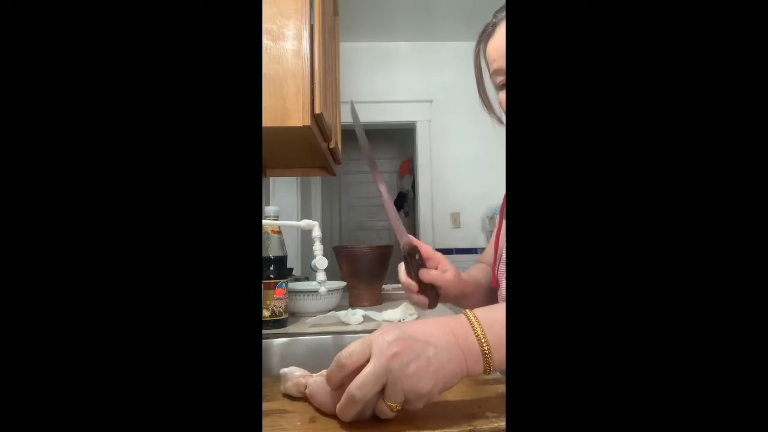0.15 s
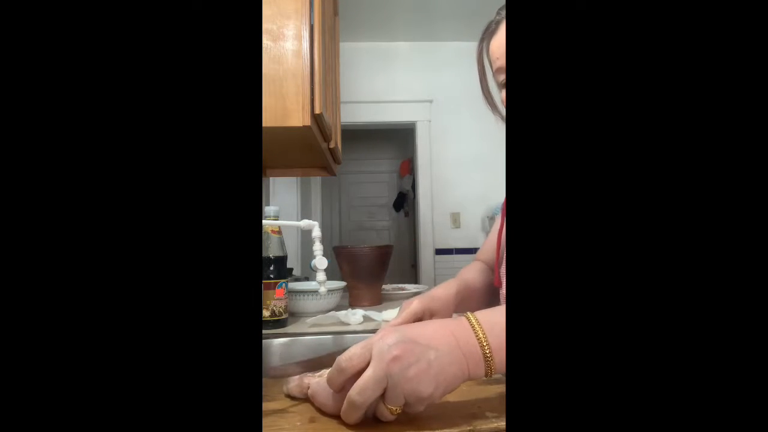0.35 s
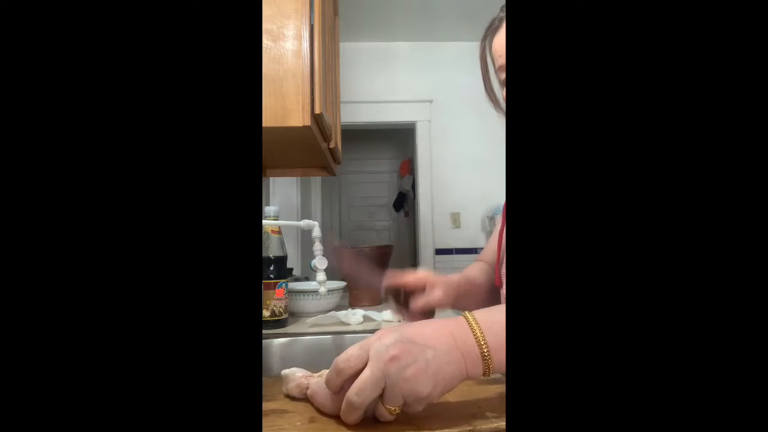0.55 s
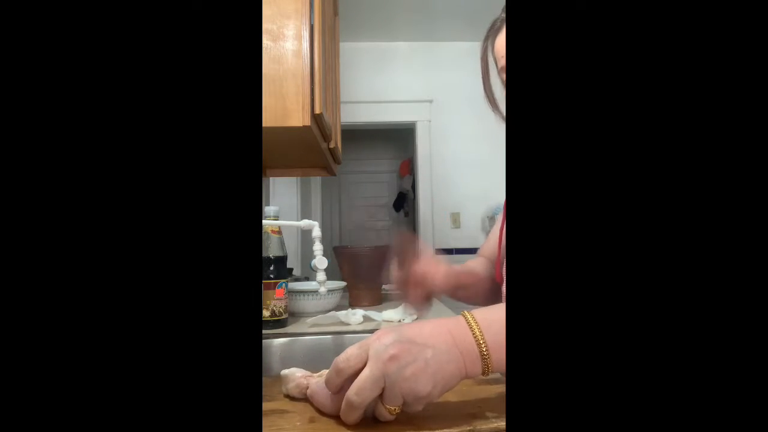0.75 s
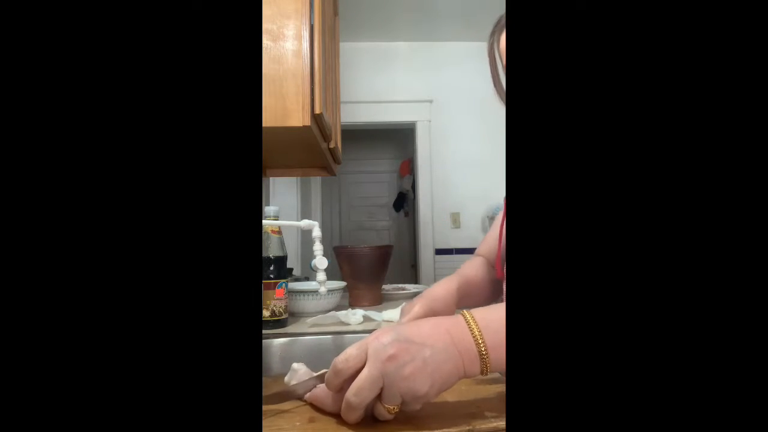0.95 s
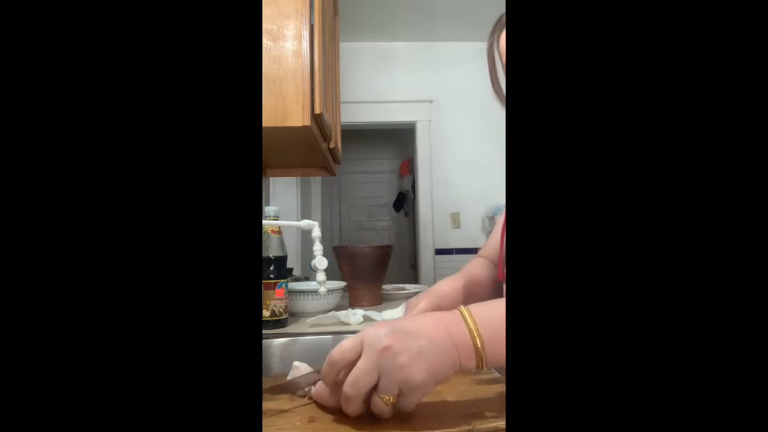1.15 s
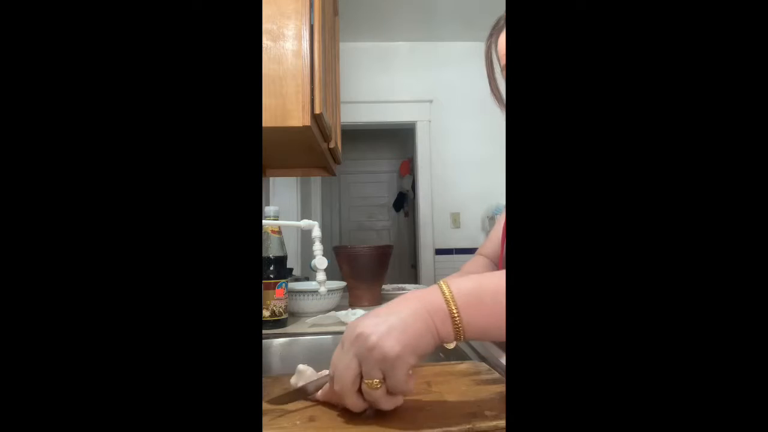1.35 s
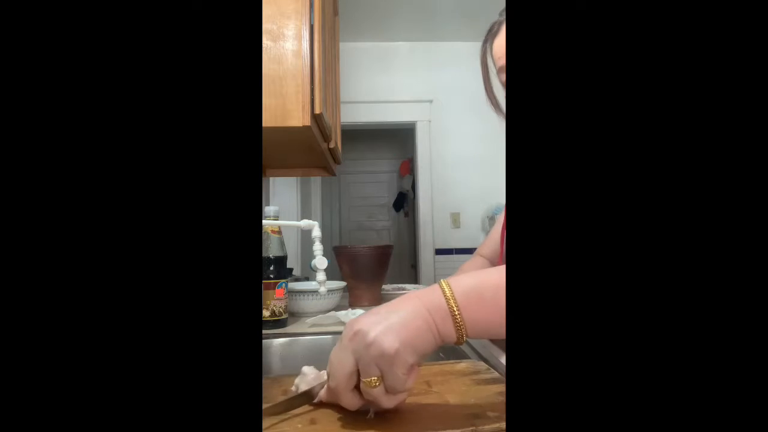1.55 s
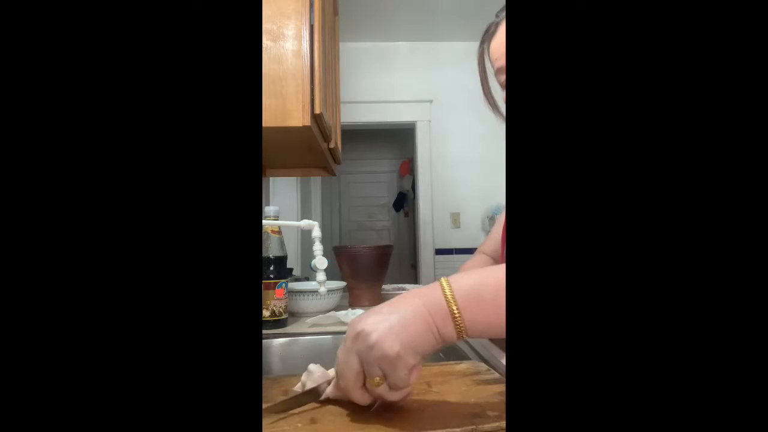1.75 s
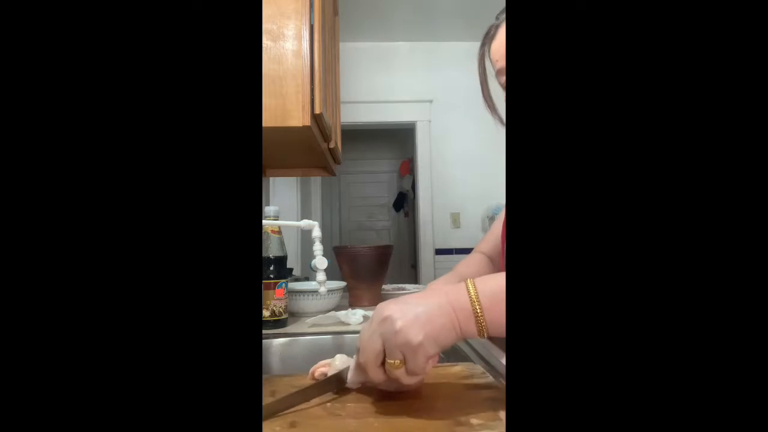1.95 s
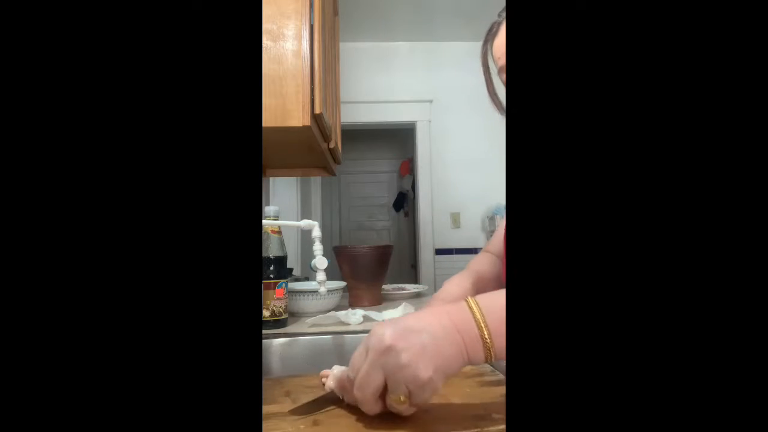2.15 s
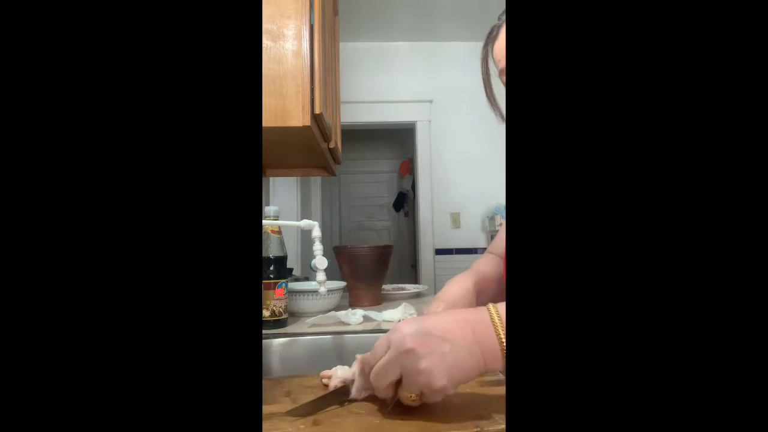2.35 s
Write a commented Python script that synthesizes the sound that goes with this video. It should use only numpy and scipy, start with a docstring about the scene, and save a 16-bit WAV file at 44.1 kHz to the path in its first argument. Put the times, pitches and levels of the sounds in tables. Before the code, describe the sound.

A knife chops raw meat on a wooden board with hard cracks, then dull knocking and sawing

```python
"""First comes the faint hum of a kitchen, then a knife chops raw chicken on a wooden board, close by.
Three hard blows crack on the wood (noise bursts), the first two after a short swell of noise; board and
steel-topped counter ring (decaying sines), a low thud follows, and the room dies away as noise. Between them
the blade saws and presses: random contacts shudder and rattle board and counter, the board knocks dully, wet
meat ticks and the blade hisses. A small piece of metal clinks once. A two-port microphone hears it in stereo."""
import sys
import numpy as np
from scipy import signal
from scipy.fft import rfft, irfft, next_fast_len
from scipy.io import wavfile

SR = 44100
rng = np.random.default_rng(int(sys.argv[2]) if len(sys.argv) > 2 else 0)


def digitize_waveform(pressure):
    """Quantize a signal to 16-bit integers and store it at the path in sys.argv[1].

    Rows of a 2-D input are taken as channels; values are limited to [-1, 1].
    """
    field = np.atleast_2d(pressure).T
    bounded = np.clip(field, -1, 1)
    quanta = np.round(bounded * 32767).astype(np.int16)
    wavfile.write(sys.argv[1], SR, quanta)


N = 105840  # samples, 2.4 s

# In all noise colours below, the levels are relative: only the balance between pitches counts.

# Murmur of the kitchen: noise colour [f/Hz, level/dB per Hz]
MURMUR_COLOUR = [(15, -39), (40, -4), (207, -12), (271, 1), (301, -11), (415, -10.5), (811, -33.5),
                 (1120, -17.5), (1280, -17), (1500, -58), (15000, -52)]
MURMUR_DB = -55
# Wavering tones in the hum [f/Hz, rms level/dB]
HUM_TONES = [(118.4, -63), (177.6, -61), (269.2, -67), (436.0, -62), (489.9, -72.5), (1093, -83.5)]
HUM_WIDTH_HZ = 6  # how far each tone is smeared in pitch

# Rings of a small piece of metal [f/Hz, level/dB, time to fall 60 dB/s]
CLINK_MODES = [(1701, -3, .035), (3402, 1, .014), (5190, -6, .015), (6864, -3, .013), (8400, -5, .012)]
CLINK_S, CLINK_DB = 1.4, -40

# Blade sliding through wet meat, one table per stretch [t/s, level/dB]
SLIDE_LEVELS = [
    [(0.88, -50), (0.918, -58), (1.108, -61.5), (1.172, -75.5), (1.18, -62.5), (1.202, -73.5), (1.22, -67),
     (1.228, -69), (1.28, -94.5)],
    [(1.31, -70), (1.316, -65.5), (1.4, -65), (1.408, -57), (1.51, -62), (1.532, -73), (1.606, -65),
     (1.616, -65), (1.644, -69), (1.65, -61), (1.682, -76), (1.81, -53.5)],
    [(1.88, -47.5), (1.896, -53), (1.904, -43), (1.934, -55), (1.98, -62.5), (2.026, -55), (2.054, -57.5),
     (2.136, -49.5), (2.158, -62.5), (2.268, -80), (2.354, -62), (2.39, -60.5)],
]
# Noise colour of that hiss [f/Hz, level/dB per Hz]
HISS_COLOUR = [(2000, -1), (2700, 2.5), (4000, 0.5), (5500, -5.5), (10700, -2.5), (15000, -11.5)]
# A stretch starts this far below its first level, ends as far below its last, and is silent outside
EDGE_S, EDGE_DROP_DB = 0.033, 4.5

# Ways the wooden board rings when free [f/Hz, level/dB, time to fall 60 dB/s]
BOARD_MODES = [(255.5, -3, 0.11), (321.3, -8.5, 0.13), (400.8, -2, 0.14), (504, -6, 0.18),
               (566.1, -3.5, 0.16), (630.8, -3, 0.17), (799, -17.5, 0.23), (893, -12, 0.14),
               (976.4, -1.5, .1), (1135, -8.5, 0.11), (1270, -1, 0.024), (1572, -2.5, 0.031),
               (1740, -5, .045), (1831, -2, 0.066), (2066, -5.5, 0.048)]
# Low rings of the worktop [f/Hz, level/dB, time to fall 60 dB/s]
WORKTOP_MODES = [(69.4, -6, 0.088), (90.5, -1.5, 0.11), (113, -4, 0.1), (148.5, -6.5, 0.18),
                 (192.1, -3, 0.23), (229.5, -7.5, 0.37)]
# Long rings of the steel counter, with a close pair that beats [f/Hz, level/dB, time to fall 60 dB/s]
COUNTER_MODES = [(151, -10, .4), (189, -1, .6), (455, -14, .7), (797, -20, .6), (365, -11.5, 1.3),
                 (377.6, -12.5, 1.3)]
MODE_SPREAD_DB = 2.5  # left-right level difference of each mode

# Shudder of board and counter under blade and hand, one table per stretch
# [t/s, boom level/dB, board level/dB, rattle level/dB]
SHUDDER_LEVELS = [
    [(0.295, -44.5, -21.5, -34), (0.381, -38, -37.5, -47), (0.487, -43.5, -37, -47),
     (0.577, -45.5, -40.5, -57.5), (0.607, -58, -50, -60), (0.631, -54.5, -50.5, -63),
     (0.665, -55, -68, -65), (0.677, -55.5, -58, -62), (0.707, -63, -60, -96), (0.745, -57, -72.5, -54.5)],
    [(0.835, -26, -24.5, -37.5), (0.945, -34, -40.5, -43.5), (1.071, -39, -39.5, -46),
     (1.181, -55.5, -53.5, -55.5), (1.267, -34, -61, -69.5), (1.301, -36.5, -56.5, -78),
     (1.309, -50.5, -65.5, -62.5), (1.323, -52, -72, -73), (1.337, -60, -68, -65), (1.38, -50, -81, -73)],
    [(1.41, -53, -61.5, -70), (1.43, -36.5, -44, -69), (1.57, -41.5, -60, -75),
     (1.582, -45.5, -52.5, -59.5), (1.646, -44.5, -59, -83), (1.672, -31, -58.5, -63),
     (1.712, -48.5, -74, -85), (1.748, -48.5, -61, -70), (1.794, -44.5, -38, -62.5),
     (1.805, -20.5, -39.5, -58)],
    [(1.895, -23.5, -26.5, -49), (1.941, -36, -42.5, -48), (2.003, -40.5, -54.5, -54.5),
     (2.023, -31, -31.5, -50), (2.147, -27, -38, -46), (2.221, -42, -55, -81.5), (2.307, -51.5, -64, -86),
     (2.323, -48.5, -72.5, -69.5), (2.337, -37.5, -52, -68), (2.39, -45, -53.5, -60)],
]
SHUDDER_PER_S, SHUDDER_GRAIN_DB = 2500, 2.5  # contacts per second, unevenness of their strength
RUB_DAMPING = 0.4  # share of the board's ring time left under a rubbing hand
# Noise colour of the rustle in the rattle [f/Hz, level/dB per Hz]
RUSTLE_COLOUR = [(650, -7), (850, 1.5), (1300, 3), (1900, -5.5), (2400, -6), (3500, -23), (6000, -29.5),
                 (10000, -36)]
RATTLE_PER_S, RATTLE_GRAIN_DB = 670, 3  # contacts per second, unevenness of their strength
RATTLE_RING_DB, RUSTLE_DB = -4.5, -3.5
RATTLE_LOW_HZ = 850  # only board modes above this rattle

# Wet ticks of meat and blade [t/s, level/dB, f/Hz]
TICK_EVENTS = [(1.059, -37.5, 2680), (1.1807, -56.5, 3920), (1.2171, -39.5, 10500), (1.3234, -46.5, 13500),
               (1.3384, -43, 10300), (1.3877, -47, 7600), (1.407, -34, 10700), (1.4119, -34.5, 8700),
               (1.4607, -42, 13500), (1.503, -46, 4870), (1.5577, -42, 12500), (1.6104, -46, 3620),
               (1.6174, -34.5, 11100), (1.6224, -45, 9500), (1.6513, -45, 4100), (1.7873, -52, 11500),
               (1.7983, -42.5, 14000), (1.9041, -36, 2470), (2.0187, -40, 3870)]
TICK_CYCLES = 24  # cycles for a tick to fall 60 dB
# Noise colour of the bright snap on each tick [f/Hz, level/dB per Hz]
SNAP_COLOUR = [(2500, -14), (8000, -5), (15000, 7)]
SNAP_DB, SNAP_T60_S = -8.5, 0.011  # level against the tick's ring, time to fall 60 dB

# The board knocks dully on the counter [t/s, level/dB, f/Hz, board ring level/dB]
KNOCK_EVENTS = [(1.241, -23, 196, -46.5), (1.271, -18.5, 210.6, -47.5), (1.428, -19, 175, -36),
                (1.445, -19.5, 190, -43), (1.500, -23.5, 141.4, -36.5), (1.576, -20, 238, -40.5),
                (1.673, -24, 231, -53), (1.789, -12, 230, -29), (1.808, -16.5, 183, -28.5),
                (1.885, -10.5, 183, -26), (2.017, -13.5, 188, -29), (2.043, -14, 170, -37.5),
                (2.074, -47.5, 188, -27.5), (2.110, -9, 191, -37.5), (2.135, -14, 207, -34.5),
                (2.338, -34, 222, -51.5), (2.351, -28, 215.5, -52.5)]
KNOCK_CYCLES, KNOCK_RISE_S = 8, 0.0013  # cycles of the starting pitch to fall 60 dB; soft contact
KNOCK_SAG = 0.45  # the pitch sinks towards this share below its start
KNOCK_CONTACT_HZ = 648  # a soft contact dulls what lies above this

# A short soft noise swells just before the crack
# [start t/s, end t/s, end level/dB, time to swell by 60 dB/s]
SWELL_EVENTS = [(0.232, 0.2480, -20, 0.026), (0.773, 0.786, -12, 0.04)]
# Noise colour of the swell [f/Hz, level/dB per Hz]
SWELL_COLOUR = [(300, -7), (700, -7), (1500, -5.5), (2500, -6.5), (4000, -21.5), (8000, -26.5),
                (11000, -37)]
SWELL_FADE_IN_S = 0.0015  # fade-in of the swell

# The blade reaches the wood; the last two rows are so close that they make one blow
# [t/s, crack level/dB, board level/dB, favoured board f/Hz, thud level/dB, thud f/Hz,
#  counter level/dB, room tail level/dB]
CHOP_EVENTS = [(0.2463, -5.5, -12.5, 657, -6, 141.8, -17, -30.5),
               (0.7850, 1, -10.5, 603, -11, 122.8, -23.5, -23),
               (1.8301, -23.5, -48.5, 1810, -23.5, 120, -35.5, -33),
               (1.8465, -11.5, -20, 567.2, -9.5, 202.4, -27.5, -38.5)]
# Noise colour of the crack [f/Hz, level/dB per Hz]
CRACK_COLOUR = [(300, -11), (1000, 8.5), (1900, -1), (2600, -20), (4200, -2.5), (5600, -17.5),
                (7000, -11.5), (10000, -13.5), (13000, -17.5), (16000, -25)]
CRACK_T60_S, CRACK_RISE_HZ = 0.012, 395  # fall by 60 dB; low-pass that makes it rise in about 1 ms
CHOP_CONTACT_HZ = 2600  # a hard contact dulls the board only above this
BOARD_LAG_S, THUD_LAG_S = 0.00308, 0.00395  # ring and thud come just after the crack
FAVOUR_DB, FAVOUR_OCTAVES = 17.5, 0.019  # boost and width around the favoured board pitch
THUD_CYCLES, PUSH_DB = 3.0, -8  # flexing cycles; level of the slow push of air under them
GLIDE, GLIDE_S = 3.2, 0.0017  # a thud starts (1 + GLIDE) times its pitch, then sags over this time
# Noise colour of the room after a blow [f/Hz, level/dB per Hz]
TAIL_COLOUR = [(60, -13), (200, -13.5), (600, -27), (1100, -9), (2000, -17), (2700, -19.5), (8400, -29),
               (11000, -32), (15000, -43)]
# How long the room holds each pitch [f/Hz, time to fall 60 dB/s]
ROOM_T60 = [(60, 0.7), (250, 0.27), (1000, 0.41), (3000, 0.22), (8000, 0.16), (15000, 0.51)]

# How alike left and right noise are [f/Hz, likeness from 0 to 1]
STEREO_LIKENESS = [(60, 0.74), (240, 1), (950, 0.96), (3770, 0.45), (15000, 1)]
# How far the left port is ahead of the right [f/Hz, phase/radians]
PORT_LEAD = [(0, 0), (340, -.7), (1030, -2.0), (1980, -1.2), (2330, -2.5), (3100, -2.6), (3880, -.4),
             (5940, 0), (7750, -.3), (8600, -.9), (11500, -2.6), (14200, -3.2), (16000, -3.1)]
# Left level minus right level [f/Hz, difference/dB]
PORT_LEVELS = [(60, 0.5), (110, 2.5), (200, 3), (380, 6), (700, -2.5), (1290, 1.5), (2380, -0.5),
               (4400, 2.5), (8120, -0.5), (15000, 1.5)]
BASS_CUT_HZ, CUTOFF_HZ = 42, 16400
TOP = 0.95  # peaks bend towards this height


def amp(db):
    """Turn dB into gain."""
    return 10 ** (np.asarray(db) / 20)


def rms_one(x):
    """Scale to rms 1."""
    return x / np.sqrt(np.mean(x ** 2) + 1e-20)


def at_hz(points, hz):
    """Read a table between its rows, on a log-frequency axis."""
    points = np.array(points)
    return np.interp(np.log(hz), np.log(points[:, 0]), points[:, 1])


def seconds_since(s):
    """Time since moment s, held at zero before it."""
    return np.maximum(np.arange(N) / SR - s, 0)


def clicks(s, gain):
    """Put a click of the given height at each time."""
    out = np.full(N, 1e-18)  # inaudible, keeps the filters fast
    np.add.at(out, (np.asarray(s) * SR).astype(int), gain)
    return out


def fade(x, t60):
    """Each click becomes a step that falls by 60 dB in t60 seconds."""
    return signal.lfilter([1], [1, -amp(-60 / (t60 * SR))], x)


def soften(x, hz):
    """Two-pole low-pass: a soft contact cannot excite high pitches."""
    return signal.sosfilt(signal.butter(2, hz, fs=SR, output="sos"), x)


def ring(x, hz, t60):
    """A unit click sets a sine of height about 1 ringing, falling by 60 dB in t60 seconds."""
    r, w = amp(-60 / (t60 * SR)), 2 * np.pi * hz / SR
    return signal.lfilter([0, np.sin(w)], [1, -2 * r * np.cos(w), r * r], x)


def lean(k):
    """Left and right gains of mode k: modes lean to either side in turn, two by two."""
    side = (-1) ** (k // 2)
    return amp(MODE_SPREAD_DB * side * np.array([[.5], [-.5]]))


def ring_all(modes, x, t60_share=1):
    """Drive all modes of a body with one signal, with alternating signs."""
    return sum(amp(db) * (-1) ** k * lean(k) * ring(x, hz, t60 * t60_share)
               for k, (hz, db, t60) in enumerate(modes))


def strike(modes, s, db, scatter_db, favoured_hz=None):
    """Each blow strikes each mode with its own strength and sign; the spot hit may favour one pitch."""
    draw = rng.standard_normal((len(s), 2, len(modes)))
    out = 0
    for k, (hz, mode_db, t60) in enumerate(modes):
        lift_db = 0
        if favoured_hz is not None:
            octaves_away = np.log2(hz / favoured_hz)
            lift_db = FAVOUR_DB * np.exp(-(octaves_away / FAVOUR_OCTAVES) ** 2)
        strength = amp(db + mode_db + lift_db + scatter_db * draw[:, 0, k])
        sign = np.sign(draw[:, 1, k])
        out = out + lean(k) * ring(clicks(s, strength * sign), hz, t60)
    return out


def grains(per_s, grain_db):
    """Random contacts of uneven strength and random sign, rms 1."""
    sizes = amp(grain_db * np.minimum(rng.exponential(1, N), 5)) * rng.choice([-1, 1], N)
    return rms_one(sizes * (rng.random(N) < per_s / SR))


def banded_noise(colour, envelope):
    """Half-octave bands of stereo noise, rms about 1 together; envelope(hz) shapes each in time."""
    out, power = 0, 0
    edges = 25 * 2 ** np.arange(0, 9.6, .5)
    white = rng.standard_normal((2, 2, N))
    for k, (low, high) in enumerate(zip(edges, edges[1:])):
        if high < colour[0][0]:
            continue  # nothing below the table's first pitch
        hz = np.sqrt(low * high)
        band = signal.butter(2, [low, high], "band", fs=SR, output="sos")
        mid, side = signal.sosfilt(band, white[k % 2])  # neighbouring bands use separate noise
        alike = np.clip(at_hz(STEREO_LIKENESS, hz), 0, 1)
        gain = amp(at_hz(colour, hz))
        power += gain ** 2 * (high - low) * 2 / SR
        stereo = np.sqrt((1 + alike) / 2) * mid + np.sqrt((1 - alike) / 2) * side * [[1], [-1]]
        out = out + gain * envelope(hz) * stereo
    return out / np.sqrt(power)


def levels(tables):
    """Gains over time, one row per level column; each stretch has sloping edges."""
    t = np.arange(N) / SR
    total = 0
    for s, *columns in map(np.transpose, tables):
        start, end = s[0] - EDGE_S, s[-1] + EDGE_S
        active = (t > start) * (t < end)
        gains = []
        for db in columns:
            edged_db = [db[0] - EDGE_DROP_DB, *db, db[-1] - EDGE_DROP_DB]
            gains.append(amp(np.interp(t, [start, *s, end], edged_db)) * active)
        total = total + np.array(gains)
    return total


def hum():
    """A broad noise murmur, plus tones that waver because noise drives narrow resonances."""
    tones = 0
    t60 = np.log(1000) / np.pi / HUM_WIDTH_HZ
    for hz, db in HUM_TONES:
        tone = ring(rng.standard_normal(N + SR), hz, t60)[SR:]  # skip one second of build-up
        tones = tones + amp(db) * rms_one(tone)
    return tones + amp(MURMUR_DB) * banded_noise(MURMUR_COLOUR, lambda hz: 1)


def clink():
    """A tap sets a small piece of metal ringing at its own high pitches."""
    return strike(CLINK_MODES, [CLINK_S], CLINK_DB, scatter_db=0)


def slide():
    """The blade rubs through wet meat: hissing noise that follows the sliding levels."""
    gain, = levels(SLIDE_LEVELS)
    return banded_noise(HISS_COLOUR, lambda hz: gain)


def rattle(gain):
    """Grainy contacts ring the board's upper modes, each shaken in its own way, over a dull rustle."""
    rings = 0
    for k, (hz, db, t60) in enumerate(BOARD_MODES):
        if hz > RATTLE_LOW_HZ:
            shaken = ring(grains(RATTLE_PER_S, RATTLE_GRAIN_DB), hz, t60)
            rings = rings + amp(db) * lean(k) * rms_one(shaken)
    rustle = banded_noise(RUSTLE_COLOUR, lambda hz: gain)
    return gain * amp(RATTLE_RING_DB) * rms_one(rings) + amp(RUSTLE_DB) * rustle


def worktop_body(x):
    """The worktop's low modes answer a contact signal with a boom."""
    return ring_all(WORKTOP_MODES, x)


def rubbed_board_body(x):
    """The board's modes answer a soft contact, damped by the rubbing hand."""
    return soften(ring_all(BOARD_MODES, x, RUB_DAMPING), KNOCK_CONTACT_HZ)


def shudder():
    """Dense uneven contacts drive the worktop's boom and the board's modes; a rattle goes with them."""
    touch = grains(SHUDDER_PER_S, SHUDDER_GRAIN_DB)
    boom_gain, board_gain, rattle_gain = levels(SHUDDER_LEVELS)
    rings = 0
    for gain, body in ((boom_gain, worktop_body), (board_gain, rubbed_board_body)):
        # divide by the body's own click response, so that the tables set the level
        loudness = np.linalg.norm(body(clicks([0], 0.97)).mean(axis=0))
        rings = rings + body(gain * touch + 1e-18) / loudness
    return rings + rattle(rattle_gain)


def ticks():
    """Each wet tick is a short ring at its own pitch with a bright snap of noise on top."""
    s, db, pitch_hz = np.transpose(TICK_EVENTS)
    rings = sum(ring(clicks([t], amp(d)), hz, TICK_CYCLES / hz) for t, d, hz in zip(s, db, pitch_hz))
    snap = fade(clicks(s, amp(db + SNAP_DB)), SNAP_T60_S)
    return rings + banded_noise(SNAP_COLOUR, lambda hz: snap)


def bump(s, db, hz):
    """A rounded low knock whose pitch sinks as it dies."""
    t = seconds_since(s)
    life = KNOCK_CYCLES / hz / np.log(1000)
    sunk_time = t - 2 * life * (1 - np.exp(-t / (2 * life)))
    phase = 2 * np.pi * hz * (t - KNOCK_SAG * sunk_time)
    return amp(db) * (1 - np.exp(-t / KNOCK_RISE_S)) * np.exp(-t / life) * np.sin(phase)


def knocks():
    """The board bumps softly on the counter, with a little of its own dulled ring."""
    s, db, pitch_hz, ring_db = np.transpose(KNOCK_EVENTS)
    bumps = sum(bump(t, d, hz) for t, d, hz in zip(s, db, pitch_hz))
    wood = strike(BOARD_MODES, s, ring_db, scatter_db=5.5)
    return bumps + soften(soften(wood, KNOCK_CONTACT_HZ), KNOCK_CONTACT_HZ)


def swells():
    """A short soft noise swells just before the crack, rising by equal dB in equal times."""
    swell = 0
    for start_s, end_s, db, rise_s in SWELL_EVENTS:
        growth = fade(clicks([end_s], amp(db))[::-1], rise_s)[::-1]  # a fade run backwards
        fade_in = np.clip((np.arange(N) / SR - start_s) / SWELL_FADE_IN_S, 0, 1) ** 2
        swell = swell + growth * fade_in
    return banded_noise(SWELL_COLOUR, lambda hz: swell)


def thump(s, db, hz):
    """The whole board flexes a few cycles, sagging in pitch, pushes air, and the counter stops it."""
    t = seconds_since(s)
    glided_time = t + GLIDE * GLIDE_S * (1 - np.exp(-t / GLIDE_S))
    turn = np.pi * np.clip(glided_time * hz / THUD_CYCLES, 0, 1)  # half a turn spans the whole thud
    flex = np.sin(2 * THUD_CYCLES * turn)
    push = amp(PUSH_DB) * np.sin(2 * turn)
    return amp(db) * np.abs(np.sin(turn)) ** .5 * (flex + push)


def chops():
    """The edge cracks on wood, board and counter ring, a low thud follows, the room dies band by band."""
    (s, crack_db, board_db, favoured_hz, thud_db, thud_hz,
     counter_db, tail_db) = np.transpose(CHOP_EVENTS)
    late_s = s + THUD_LAG_S
    burst = soften(fade(clicks(s, amp(crack_db)), CRACK_T60_S), CRACK_RISE_HZ)
    crack = banded_noise(CRACK_COLOUR, lambda hz: burst)
    wood = strike(BOARD_MODES, s + BOARD_LAG_S, board_db, 2.0, favoured_hz)
    steel = sum(lean(k) * ring(clicks(late_s, amp(counter_db + db)), hz, t60)
                for k, (hz, db, t60) in enumerate(COUNTER_MODES))
    thud = sum(thump(t, db, hz) for t, db, hz in zip(late_s, thud_db, thud_hz))
    room_hits = clicks(late_s, amp(tail_db))
    tail = banded_noise(TAIL_COLOUR, lambda hz: fade(room_hits, at_hz(ROOM_T60, hz)))
    return crack + soften(wood, CHOP_CONTACT_HZ) + steel + soften(thud, KNOCK_CONTACT_HZ) + tail


def scene():
    """All sounds at the board and the clink, over the hum of the kitchen."""
    background = hum() + clink()
    blade_work = slide() + shudder() + ticks() + knocks()
    return background + blade_work + swells() + chops()


def record(dry):
    """The two ports differ in phase and level with frequency; peaks are rounded, bass and top are cut."""
    size = next_fast_len(N + 4096)
    hz = np.arange(size // 2 + 1) * SR / size
    lead = np.interp(hz, *np.transpose(PORT_LEAD))
    balance_db = np.interp(hz, *np.transpose(PORT_LEVELS))
    half = np.exp(.5j * lead) * amp(balance_db / 2)  # each port takes half the difference
    ports = irfft(rfft(dry, size) * [half, 1 / half], size)[:, :N]
    ports = signal.sosfilt(signal.butter(3, BASS_CUT_HZ, "high", fs=SR, output="sos"), ports)
    rounded = TOP * np.tanh(ports / TOP)
    return signal.sosfilt(signal.cheby2(12, 70, CUTOFF_HZ, fs=SR, output="sos"), rounded)


dry = scene()
out = record(dry)
digitize_waveform(out)
```